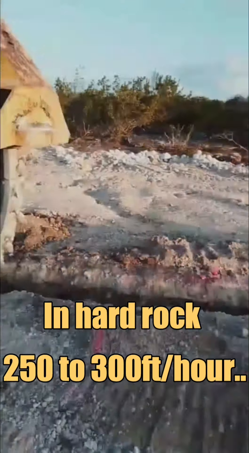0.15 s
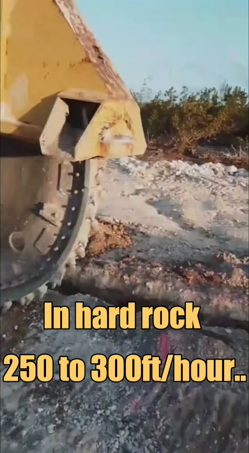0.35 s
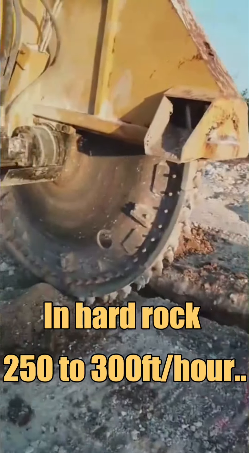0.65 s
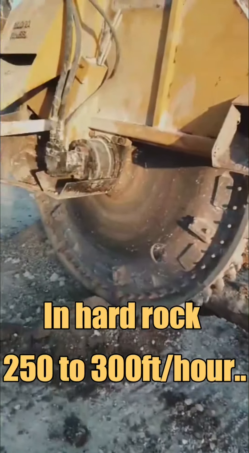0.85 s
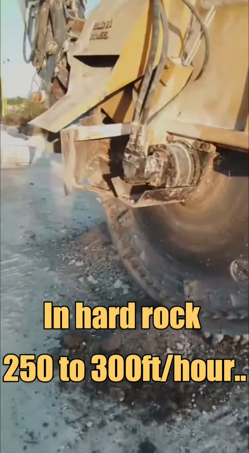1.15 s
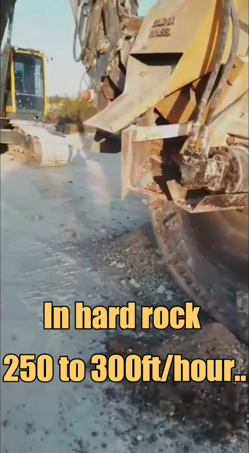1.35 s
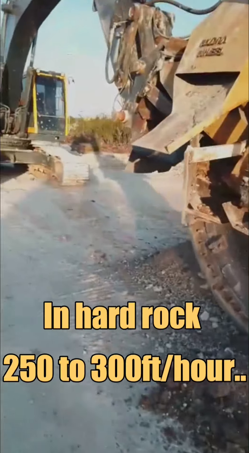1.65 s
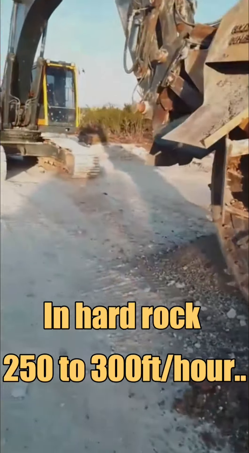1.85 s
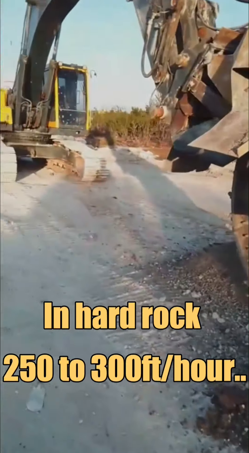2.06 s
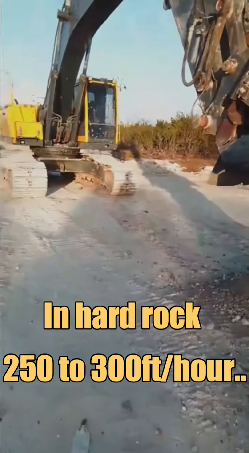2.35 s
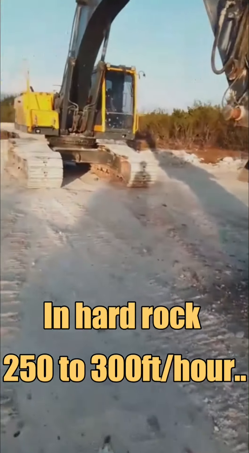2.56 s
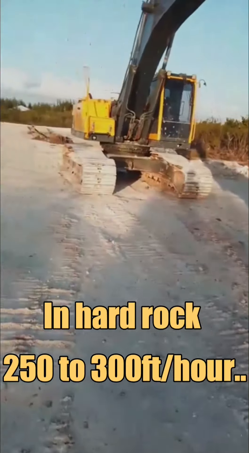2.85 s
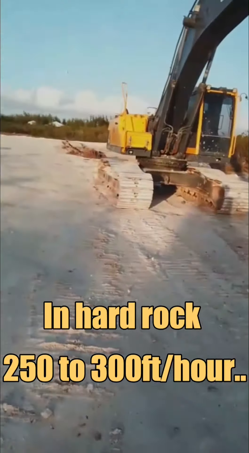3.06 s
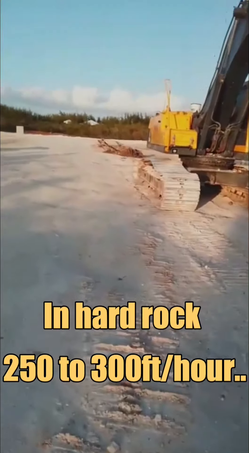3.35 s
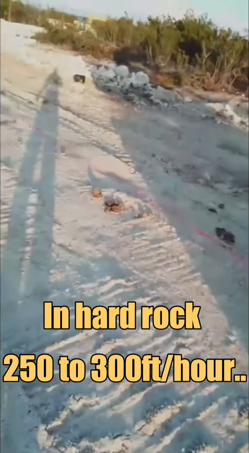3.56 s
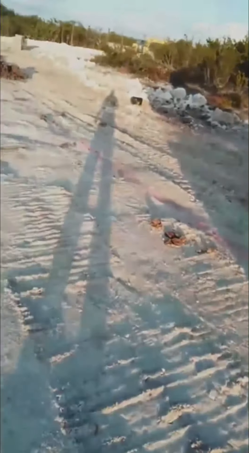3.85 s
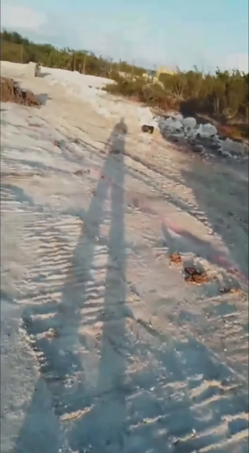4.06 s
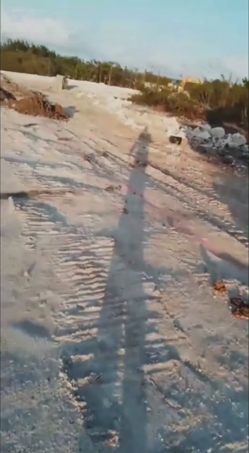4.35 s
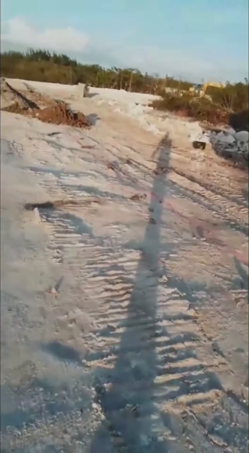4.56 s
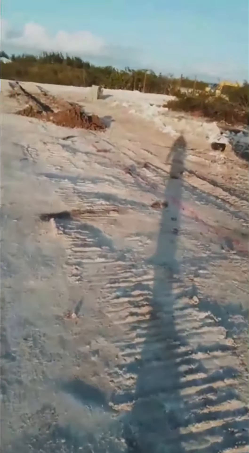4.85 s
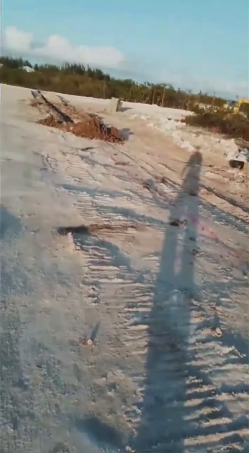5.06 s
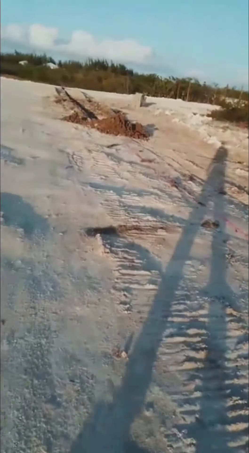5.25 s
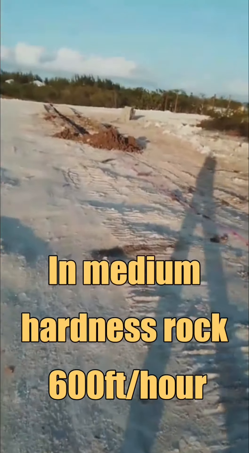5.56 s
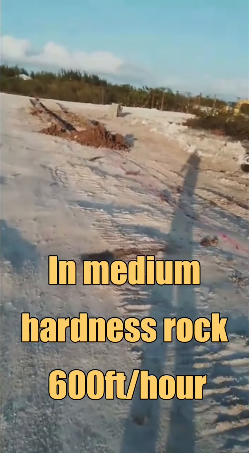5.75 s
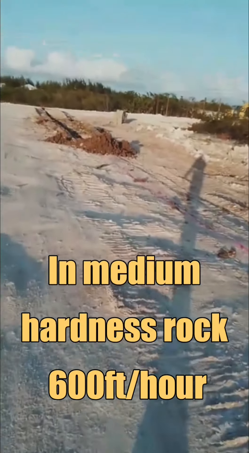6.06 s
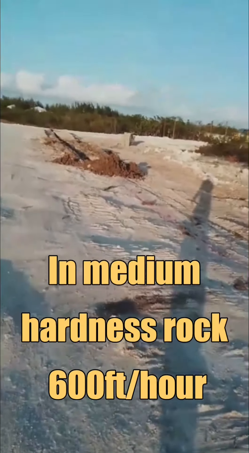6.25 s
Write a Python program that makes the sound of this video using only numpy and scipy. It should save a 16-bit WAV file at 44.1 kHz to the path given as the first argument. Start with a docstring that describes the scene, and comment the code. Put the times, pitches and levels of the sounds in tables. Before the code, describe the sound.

Distant muffled diesel idle with soft knocks and a burst of wind buffeting, then abruptly a much louder, brighter, clattering idle that holds steady.

```python
"""Idling six-cylinder diesel, far then near

A diesel machine idles on open ground, heard from afar, then after a hard cut from close by.
Engine: shaped noise throbbing with six firings a cycle; one loud cylinder knocks, a thin cover rings.
Close by, valve gear ticks. A hydraulic pump hums at multiples of one pitch over a faint drone.
Wind: decaying sine thumps on the microphone, lumpy noise flutter and rumble.
Treble: roar and knocks below a moving edge, narrow hissing bands and a faint broad hiss."""
import sys
import numpy as np
from scipy import signal
from scipy.fft import rfft, irfft, next_fast_len
from scipy.io import wavfile
from scipy.ndimage import uniform_filter1d, map_coordinates

SR = 44100
rng = np.random.default_rng(int(sys.argv[2]) if len(sys.argv) > 2 else 0)


def how_loud(loudness_db):
    """Turn decibels into a plain amplitude multiplier (0 dB gives 1, 20 dB gives 10)."""
    steps = np.asarray(loudness_db, float) / 20
    return 10 ** steps


def digitize_waveform(pressure):
    """Quantize a signal to 16-bit integers and store it at the path in sys.argv[1].

    Rows of a 2-D input are taken as channels; values are limited to [-1, 1].
    """
    field = np.atleast_2d(pressure).T
    bounded = np.clip(field, -1, 1)
    quanta = np.round(bounded * 32767).astype(np.int16)
    wavfile.write(sys.argv[1], SR, quanta)


N = 282636
T = np.arange(N) / SR
CUT_S = 3.5665  # far position before, near after
CYCLE_HZ = 6.504  # four-stroke cycles

# All levels are relative; pairs are (far, near).
# Roar over time: [t/s, level/dB, bass over it/dB, treble over it/dB]
ROAR = ([(0, -38.5, 7.5, 9), (.6, -39, 8, 5.5), (1.1, -38.5, 4.5, 5), (1.8, -38.5, 8, 3),
        (2.2, -37.5, 8, -1.5), (2.7, -37.5, -5.5, 2), (3.56, -38, 7, -0.5)], [(3.57, -21.5, 2.5, 0),
        (4.1, -21, -0.5, 0), (4.5, -21, -1.5, 1.5), (5.0, -21.5, -4, -0.5), (5.7, -22, -3.5, -1.5),
        (6.41, -22.5, -4.5, -1.5)])
BASS_BELOW_HZ, TREBLE_ABOVE_HZ = 560, 1950
# Roar noise density, far and near: [f/Hz, density/dB]
FAR_SPECTRUM = [(100, -48), (170, -17), (303, -7), (337, -14.5), (552, -14.5), (693, -3.5), (830, -8.5),
                (1280, -7.5), (1360, -8.5), (1480, -13), (1670, -12), (2600, -22.5), (3000, -30),
                (3900, -68), (6600, -120)]
NEAR_SPECTRUM = [(100, -69.5), (170, -26.5), (222, -13), (307, -2), (425, -6.5), (614, -6), (662, -10.5),
                 (712, -8.5), (1050, -11), (1630, -17.5), (1860, -15.5), (2610, -22.5), (3620, -29),
                 (4860, -32), (5800, -44), (7540, -73), (12800, -120)]
# Hood resonances and dips: [f/Hz, width/Hz, gain/dB]
HOOD = [(846, 11, 2.5), (1068, 110, 3), (1256, 49, 1.5), (1843, 57, 5.5), (2640, 110, 7), (4560, 110, -4.5)]
# Moving upper edge of roar and knocks, pair: [t/s, f/Hz]
EDGE = ([(0, 3120), (.56, 3040), (.6, 2840), (.74, 2820), (.85, 2635), (1.78, 2700), (1.86, 2300),
        (1.95, 1970), (2.475, 1950), (2.495, 2660), (3.3, 2870), (3.56, 2500)], [(3.57, 5600), (4.0, 5570),
        (4.82, 5300), (4.95, 5200), (5.48, 4980), (5.58, 4900), (5.8, 4760), (5.86, 4270), (6.41, 4170)])
# Spots of engine sound that rise or sink: [t/s, half length/s, f/Hz, half width/Hz, gain/dB]
SPOTS = [(0.27, 0.42, 2590, 74, 9.5), (1.26, 0.17, 2500, 150, 7.5), (0.24, 0.098, 2660, 180, -7),
         (1.12, 0.27, 1710, 96, -14), (1.16, 0.26, 2340, 170, -11), (2.7, 0.91, 1400, 62, -10.5),
         (2.6, 0.063, 2000, 48, -13), (2.1, 0.27, 175, 166, -21), (5.4, 0.58, 4600, 130, -17),
         (5.1, 0.25, 4960, 96, 1), (4.6, 0.07, 5300, 320, -7), (3.1, 0.17, 5450, 200, -3),
         (5.7, .25, 4530, 460, -8.5), (4.17, 0.17, 4300, 60, -7.5), (4.0, .5, 3600, 250, -3.5),
         (3.4, .42, 3800, 60, -9), (3.1, 0.23, 4100, 67, -11)]

# First knock of the loud cylinder, far and near: [t/s]
FIRST_KNOCK_S = .039, 3.696
# Knock strength: [t/s, level/dB]
KNOCK_LEVEL = [(0, -22), (.4, -18.5), (.9, -20.5), (1.7, -27), (3.55, -35.5), (3.58, -10.5), (6.41, -12.5)]
# Knocks with a set time and strength: [t/s, level/dB]
HARD_KNOCKS = [(.046, -21), (.198, -21), (.346, -18.5), (.502, -18.5), (3.697, -5.5), (4.314, -2.5),
               (4.62, -5), (4.771, -5), (5.387, -8.5), (5.695, -8), (6.001, -5.5), (5.543, -9)]
# Engine block resonances in the knock: [f/Hz, width/Hz, level/dB]
BLOCK = [(578, 165, 4), (1026, 230, -1.5), (1425, 190, -3), (1970, 1100, -11.5), (2482, 194, -6.5),
         (4320, 5300, -28)]
# Thin cover's ring after each knock: [f/Hz, level/dB, t60/s]
COVER = [(836.4, -9, 0.16), (1013, -11, 0.17), (1420, -18, 0.23)]
KNOCK_SCATTER_DB = 2
CRACK_DB, CRACK_T60_S = -5, 0.028  # sharp front of a knock
CHATTER_DB, CHATTER_T60_S, CHATTER_SCATTER_DB = -2.5, 0.049, 1.5  # burst at every firing

# Valve gear close by: [t/s, broad tick level/dB, thin ring level/dB]
VALVES = [(3.57, -43, -57), (3.7, -31.5, -56), (4.2, -30, -49), (4.4, -35, -44), (4.7, -34.5, -51.5),
          (5.1, -40.5, -46), (5.45, -41, -42.5), (5.8, -53, -43.5), (6.41, -61, -52)]
# Modes of one valve tick: [f/Hz, level/dB, t60/s]
TAPPET = [(3984, 1.5, 0.048), (4170, -2, 0.039), (4240, -2, 0.038), (4440, -4, .03), (4800, -4, .03)]
VALVE_RISE = 0.07  # share a tick's pitch has climbed after 15 ms

PUMP_HZ = 312.2
# Pump hum, pair: [t/s, level/dB of multiples 1, 2, 4]
PUMP = ([(0, -45, -69, -42), (.36, -46, -66, -45), (.53, -40, -65, -55), (.62, -55, -47, -62),
        (.8, -64, -58, -50), (1.15, -54, -61, -43.5), (1.7, -63.5, -45, -47.5), (2.5, -47, -50, -64),
        (2.96, -43, -40.5, -53), (3.16, -46, -48, -46), (3.3, -58, -37, -50), (3.56, -53, -45.5, -47)],
        [(3.58, -31.5, -47, -29), (3.65, -26, -54, -31.5), (3.83, -22.5, -44, -36), (3.96, -32, -39, -38.5),
        (4.12, -46, -43, -55), (4.33, -22.5, -29.5, -48), (4.47, -38, -31.5, -42), (4.6, -37, -34, -43),
        (4.72, -30, -30, -45), (4.89, -32.5, -28.5, -42.5), (5.0, -41.5, -32, -47), (5.45, -32, -33, -46),
        (5.85, -34, -32.5, -41.5), (6.0, -30.5, -35.5, -40), (6.12, -27, -44, -38),
        (6.2, -35.5, -42, -32.5), (6.41, -30.5, -54, -38)])
# Throb depth at the firing rate: [multiples 1, 2, 4]
PUMP_THROB = (0.34, 0.46, 0.22)
# Faint drone lines: [f/Hz, level/dB]
DRONE = [(115, -66.5), (150.7, -48)]

# Thumps on the microphone: [t/s, level/dB, f/Hz, t60/s, sharp front level over it/dB]
GUSTS = [(1.219, -21, 251.5, 0.093, -22), (1.262, -17, 338, 0.08, -7), (1.391, -12, 306, 0.022, -18),
         (1.402, -15, 281, 0.064, -9), (1.469, -18, 272, 0.1, -15), (1.509, -15, 323, 0.035, -20),
         (1.546, -14.5, 268, 0.026, -24), (2.078, -22, 426, 0.04, -16), (2.446, -18.5, 374, 0.083, -27),
         (2.478, -8, 307, 0.021, -12), (2.491, -15.5, 374, 0.038, -24), (2.573, -10.5, 289, 0.047, -26),
         (2.651, -15.5, 292, 0.052, -19), (2.756, -5, 280, 0.038, -15), (2.765, -12.5, 342, 0.052, 1),
         (2.777, -8.5, 405, 0.063, -6), (2.792, -7, 316, 0.031, -8), (2.8, -8.5, 414, 0.026, -10),
         (2.813, -8, 377, 0.039, -20), (2.826, -14.5, 298, .03, -11), (2.835, -8.5, 326, 0.018, 1),
         (2.84, -8, 297, .035, -18), (2.855, -13, 320, 0.028, -11), (2.875, -19, 330, 0.026, -14),
         (2.899, -14.5, 339, 0.05, -11), (2.914, -12.5, 297, 0.045, -23), (2.943, -12, 363, 0.042, -1),
         (2.964, -12, 294, 0.048, -17), (3.035, -16.5, 295, 0.063, -14), (3.322, -18.5, 318, 0.03, -19),
         (3.34, -20, 342, 0.056, -15)]
# Wind strength, pair: [t/s, level/dB]
WIND = ([(0, -45), (.25, -52), (.5, -41), (.84, -54), (1.0, -36.5), (1.15, -42), (1.28, -34.5),
        (1.5, -31.5), (1.62, -38), (1.75, -45.5), (1.85, -66), (2.12, -62), (2.2, -38), (2.49, -32),
        (2.62, -31.5), (2.745, -28.5), (2.79, -18.5), (2.87, -24), (2.96, -29.5), (3.3, -41.5),
        (3.56, -41)], [(3.57, -37), (4.3, -38), (4.9, -40), (5.7, -43), (6.41, -41)])
# Flutter noise density: [f/Hz, density/dB]
FLUTTER = [(100, -40.5), (170, -9.5), (248, 3.5), (358, 0.5), (398, -4), (609, -6.5), (1200, -44.5),
           (1560, -66), (2640, -120)]
# Rumble noise density: [f/Hz, density/dB]
RUMBLE = [(15, -56.5), (25, -28), (49, -25), (108, 0), (165, 3), (210, -26), (360, -120)]
RUMBLE_DB, RUMBLE_DB_PER_DB, NEAR_RUMBLE_DB = -52, 0.71, 3  # at strength -37 dB; slope; added near

# Hissing bands: [from/Hz, to/Hz, thin line f/Hz, rest level/dB,
#                 swells [t/s, hold/s, level/dB, fade/(dB/s)]]
HISS_BANDS = [(3130, 4200, 3550, -84.5, [(2.7, .1, -67.5, 49), (2.88, 0.18, -54.5, 55.5)]),
              (3300, 3730, 3330, -94.5, [(1.48, 0.15, -64.5, 90), (3.1, 0.15, -60.5, 79.5)]),
              (3450, 3800, 3680, -93.5, [(2.58, .2, -63, 59.5), (3.3, 0.09, -70.5, 59.5)]),
              (4860, 4950, 4920, -85.5, [(0, .055, -53.5, 53), (1.288, 0.43, -56.5, 54),
              (5.948, 0.16, -73, 57)]), (4830, 4900, 4870, -88, [(1.88, 0.26, -58, 200)]),
              (4720, 4870, 4790, -87.5, [(2.3, 0.18, -74.5, 53), (2.66, .12, -63, 60),
              (3.22, 0.1, -62.5, 80)]), (5050, 5170, 5110, -86.5, [(2.65, .15, -68.5, 55.5),
              (3.15, 0.22, -70, 119)]), (4760, 5670, 5300, -83, [(2.84, .2, -54.5, 70)]),
              (5390, 5510, 5440, -93.5, [(1.3, .08, -77, 59), (1.44, .33, -66, 150),
              (2.45, 0.11, -72, 100)]), (6000, 6520, 6450, -89.5, [(1.3, .17, -67.5, 48)]),
              (6380, 7020, 6800, -90.5, [(2.82, 0.17, -67, 121)])]
SWELL_DB_PER_S = 149
# Broad hiss, pair: [t/s, hiss level/dB, high hiss level/dB]
AIR = ([(0, -78.5, -76), (.56, -78.5, -76), (1.3, -77.5, -88), (2.8, -79.5, -90), (3.54, -84.5, -86)],
       [(3.57, -74, -79), (3.75, -73.5, -78), (4.3, -74, -85), (5.2, -76.5, -91.5), (6.41, -79, -96.5)])
# Densities of hiss and high hiss: [f/Hz, density/dB]
HISS = [(1180, -45.5), (2000, -5.5), (3590, -15), (4130, -18), (4820, -9.5), (5160, -12.5), (5830, -12),
        (9360, -25.5), (15700, -31), (15800, -70)]
HIGH_HISS = [(8000, -12), (9500, -9.5), (10800, -10), (12000, -24)]

# Faint broad ticks: [t/s, level/dB]
TICKS = [(5.348, -51.5), (5.358, -53)]
TICK_T60_S = .012
CUT_CLICK_DB, CUT_CLICK_S = -16, .00003


def unit(x):
    """Scale to rms 1."""
    return x / np.sqrt(np.mean(x ** 2) + 1e-20)


def along(points, hz):
    """Interpolate (Hz, value) points on a log frequency axis."""
    f, v = np.transpose(points)
    return np.interp(np.log(hz + 1), np.log(f + 1), v)


def curves(rows, t=T):
    """Interpolate each column after the time at times t."""
    s, *cols = np.transpose(rows)
    return np.array([np.interp(t, s, c) for c in cols])


def spliced(far, near):
    """Far curves up to the cut, near ones after it."""
    return np.where(T < CUT_S, curves(far), curves(near))


def wobble(rate_hz):
    """Smooth random curve with rate_hz knots a second."""
    knots = rng.standard_normal(int(N * rate_hz / SR) + 4)
    return map_coordinates(knots, [np.arange(N) * rate_hz / SR])


def noise(response):
    """Noise of rms 1 with a frequency-dependent gain."""
    m = next_fast_len(N + 8192)
    spectrum = rfft(rng.standard_normal(m)) * response(np.fft.rfftfreq(m, 1 / SR))
    return unit(irfft(spectrum, m)[:N])


def bumps(modes, hz):
    """One resonance curve of peak 1 per (Hz, width, ..) row."""
    return np.array([1 / (1 + ((hz - c) / (w / 2)) ** 2) for c, w, _ in modes])


def band(lo_hz, hi_hz, skirt_hz):
    """Response of a flat band with steep skirts."""
    def response(hz):
        outside_hz = np.maximum(np.maximum(lo_hz - hz, hz - hi_hz), 0)
        return np.exp(-(outside_hz / skirt_hz) ** 2)
    return response


def beats(count, phase, sharp):
    """Throb of count beats per engine cycle, peak 1."""
    return np.exp(sharp * (np.cos(2 * np.pi * (count * CYCLE_HZ * T - phase)) - 1))


def field(shape, tall, long):
    """Random patches over frequency and time, rms 1."""
    patches = uniform_filter1d(rng.standard_normal(shape), size=tall, axis=0)
    return unit(uniform_filter1d(patches, size=long, axis=1))


def streaky(x, streak_db, patch_db):
    """Give x thin lasting streaks and short broad patches of gain."""
    z = signal.stft(x, nperseg=1024)[2]
    streaks = streak_db * field(z.shape, tall=2, long=24)
    patches = patch_db * field(z.shape, tall=8, long=4)
    y = signal.istft(z * how_loud(streaks + patches), nperseg=1024)[1][:N]
    # offset the mean power the random gain adds
    return y * np.exp(-(np.log(10) / 20) ** 2 * (streak_db ** 2 + patch_db ** 2))


def engine(spectrum, levels, edge, knock, throb_db, ragged_hz):
    """Firing-throbbed noise roar with bent bass and treble, plus knocks, under a ragged upper edge."""
    def colour(hz):
        return how_loud(along(spectrum, hz) + np.transpose(HOOD)[2] @ bumps(HOOD, hz))

    def above(corner_hz):
        return 1 / (1 + (corner_hz / (hz[:, None] + 1)) ** 8)

    throb = throb_db * beats(count=6, phase=0.31, sharp=1.8)
    roar = noise(colour) * how_loud(throb + 0.54 * wobble(5.85))
    roar = streaky(roar, streak_db=1.82, patch_db=0.5)
    hz, t, z = signal.stft([roar, knock], SR, nperseg=1024)
    level_db, bass_db, treble_db = curves(levels, t)
    bend_db = level_db + bass_db * (1 - above(BASS_BELOW_HZ)) + treble_db * above(TREBLE_ABOVE_HZ)
    spot_db = sum(db * np.exp(-((t - s) / long) ** 4 - ((hz[:, None] - mid) / wide) ** 4)
                  for s, long, mid, wide, db in SPOTS)
    beyond_hz = hz[:, None] - curves(edge, t) + ragged_hz * field(bend_db.shape, tall=2, long=20)
    below_edge = 1 / (1 + np.exp(np.clip(beyond_hz / 30, -50, 50)))
    heard = how_loud(spot_db) * (how_loud(-38.0) + below_edge)
    return signal.istft((z[0] * how_loud(bend_db) + z[1]) * heard, SR, nperseg=1024)[1][:N]


def knocks():
    """Once a cycle: envelope of the loud cylinder's combustion burst, and the cover ring it starts."""
    swell, ring, t = np.zeros(N + SR), np.zeros(N + SR), np.arange(SR // 4) / SR
    far_times = np.arange(FIRST_KNOCK_S[0], CUT_S, 1 / CYCLE_HZ)
    near_times = np.arange(FIRST_KNOCK_S[1], T[-1], 1 / CYCLE_HZ)
    times = np.r_[far_times, near_times]
    luck = rng.standard_normal((len(times), len(COVER) + 2))
    levels = curves(KNOCK_LEVEL, times)[0] + KNOCK_SCATTER_DB * luck[:, -1]
    times = times + .002 * luck[:, -2]
    for s, db in HARD_KNOCKS:
        nearest = np.argmin(abs(times - s))
        times[nearest], levels[nearest] = s, db
    decay = how_loud(-60 * t / 0.15) + how_loud(CRACK_DB - 60 * t / CRACK_T60_S)
    burst = decay * (1 - np.exp(-t / .003))
    ring_rise = 1 - np.exp(-(t / .014) ** 2)
    for s, db, each in zip(times, levels, luck):
        start = round(s * SR)
        swell[start:][:len(t)] += how_loud(db) * burst
        modes = sum(how_loud(level + 2.0 * u - 60 * t / t60) * np.sin(2 * np.pi * hz * (1 + 0.01 * u) * t)
                    for (hz, level, t60), u in zip(COVER, each))
        ring[start:][:len(t)] += how_loud(db) * ring_rise * modes
    return swell[:N], ring[:N]


def chatter():
    """Envelope of a short burst at every firing, each of its own size."""
    firing = 6 * CYCLE_HZ * (T + 1 / CYCLE_HZ - np.where(T < CUT_S, *FIRST_KNOCK_S))
    sizes_db = CHATTER_SCATTER_DB * rng.standard_normal(int(firing.max()) + 1)
    since_s = firing % 1 / (6 * CYCLE_HZ)
    level_db = curves(KNOCK_LEVEL)[0] + CHATTER_DB + sizes_db[firing.astype(int)]
    return how_loud(level_db - 60 * since_s / CHATTER_T60_S) * (1 - np.exp(-since_s / 0.0038))


def valves():
    """Near only: three ticks a cycle as decaying, rising modes; a thin noise ring swells with each."""
    tick_db, ring_db = curves(VALVES)
    tick, t = np.zeros(N + SR), np.arange(SR // 20) / SR
    times = (np.arange(3 * CYCLE_HZ * T[-1]) + .14) / (3 * CYCLE_HZ)
    warped_s = t + VALVE_RISE * t ** 2 / .03
    for s, luck in zip(times, rng.standard_normal((len(times), 2, len(TAPPET)))):
        modes = sum(how_loud(db + 1.5 * u - 60 * t / t60) * np.sin(2 * np.pi * hz * (1 + 0.014 * v) * warped_s)
                    for (hz, db, t60), u, v in zip(TAPPET, *luck))
        tick[round(s * SR):][:len(t)] += modes * (1 - np.exp(-t / 0.0035))
    ring = (.3 + beats(count=3, phase=0.2, sharp=12.0)) * noise(band(3830, 3870, 25))
    return (how_loud(tick_db) * tick[:N] + how_loud(ring_db) * ring) * (T >= CUT_S)


def pump():
    """Wavering sine multiples with side lines from the firings' throb, over a faint drone."""
    turn = 2 * np.pi * (PUMP_HZ * T + 0.046 * wobble(35))
    throb = np.cos(2 * np.pi * (6 * CYCLE_HZ * T - .25))
    hum = 0
    for k, db, depth in zip((1, 2, 4), spliced(*PUMP), PUMP_THROB):
        gain = np.sqrt(2) * how_loud(db + (2.0 + 0.16 * k) * wobble(30))
        hum = hum + gain * (1 + depth * throb) * np.sin(k * turn)
    drone = sum(how_loud(db + 1.8 * wobble(3.5)) * np.sin(2 * np.pi * hz * T) for hz, db in DRONE)
    drone_gate = np.clip((spliced(*WIND)[0] + 60) / 8, 0, 1)  # drone falls away in the wind's lull
    return hum + drone_gate * drone


def wind():
    """Eddies thump the microphone for a cycle or two over lumpy noise flutter; a rumble lies below."""
    thumps, t = np.zeros(N + SR), np.arange(SR // 8) / SR
    for (s, db, hz, t60, front_db), luck in zip(GUSTS, rng.standard_normal((len(GUSTS), 6))):
        pitch_hz = hz * np.c_[[.75, 1, 1.5]] * np.exp(0.057 * luck[:3, None])
        partials = np.c_[[.5, 1, .35]] * np.sin(2 * np.pi * pitch_hz * t + 0.51 * luck[3:, None])
        front_hz = 740 * np.exp(0.096 * luck[0])
        front = how_loud(front_db - 60 * t / 0.04) * np.sin(2 * np.pi * front_hz * t)
        envelope = how_loud(db + 5.5 - 60 * t / t60) * (1 - np.exp(-(t / (0.055 * t60)) ** 2))
        thumps[round(s * SR):][:len(t)] += envelope * (partials.sum(axis=0) + front)
    low_cut = signal.butter(3, 190, "high", fs=SR, output="sos")
    strength_db, = spliced(*WIND)
    lumps = how_loud(4.8 * np.tanh(0.31 * wobble(60)) + 0.8 * wobble(60))
    flutter = how_loud(strength_db) * unit(lumps * noise(lambda hz: how_loud(along(FLUTTER, hz))))
    rumble_db = RUMBLE_DB + RUMBLE_DB_PER_DB * (strength_db + 37.0)
    rumble_db = rumble_db + np.where(T < CUT_S, 0, NEAR_RUMBLE_DB)
    rumble = unit(how_loud(2.0 * wobble(21)) * noise(lambda hz: how_loud(along(RUMBLE, hz))))
    return signal.sosfilt(low_cut, thumps[:N] + flutter) + how_loud(rumble_db) * rumble


def treble(knock):
    """Narrow noise bands that come and go over a faint broad hiss, which swells with the knocks."""
    narrow, slow = 0, T[::64]
    for lo, hi, line, rest_db, swells in HISS_BANDS:
        def colour(hz):
            return band(lo, hi, 40)(hz) * (1 + 1.9 * bumps([(line, 50, 0)], hz)[0])

        gain = how_loud(rest_db)
        for s, hold, db, fade_db in swells:
            rise_db = SWELL_DB_PER_S * np.maximum(s - slow, 0)
            fall_db = fade_db * np.maximum(slow - s - hold, 0)
            gain = gain + how_loud(db - rise_db - fall_db)
        narrow = narrow + np.interp(T, slow, gain) * how_loud(0.58 * wobble(25.3)) * noise(colour)
    hiss_db, high_db = spliced(*AIR)
    hiss = how_loud(hiss_db + 15.5) * (1 + 1.4 * knock) * noise(lambda hz: how_loud(along(HISS, hz)))
    high = noise(lambda hz: how_loud(along(HIGH_HISS, hz)) * (abs(hz - 10000) < 3000))
    broad = hiss + how_loud(high_db + 4.5) * high
    return streaky(narrow, streak_db=3.0, patch_db=1.0) + streaky(broad, streak_db=3.5, patch_db=1.2)


def clicks():
    """Decaying noise ticks, and an exponential pulse at the cut."""
    s, db = np.transpose(TICKS)
    since_s = T - s[:, None]
    decay = how_loud(db[:, None] - 60 * np.maximum(since_s, 0) / TICK_T60_S) * (since_s > 0)
    ticks = decay.sum(axis=0) * rng.standard_normal(N)
    after = np.arange(N) - round(CUT_S * SR) - 4  # samples
    pulse = (after >= 0) * np.exp(-np.maximum(after, 0) / (CUT_CLICK_S * SR))
    return ticks + how_loud(CUT_CLICK_DB) * pulse


def scene():
    """Two positions joined by a hard cut; close by, the burst covers most of the ring."""
    swell, ring = knocks()
    block = noise(lambda hz: how_loud(np.transpose(BLOCK)[2]) @ bumps(BLOCK, hz) * (hz > 150))
    burst = how_loud(-12.5) * (swell + chatter()) * block
    far_knock = how_loud(-4.5) * burst + how_loud(1.5) * ring
    near_knock = burst + how_loud(-6.0) * ring
    far = engine(FAR_SPECTRUM, ROAR[0], EDGE[0], far_knock, throb_db=-1.0, ragged_hz=60)
    near = engine(NEAR_SPECTRUM, ROAR[1], EDGE[1], near_knock, throb_db=1.0, ragged_hz=80)
    machine = np.where(T < CUT_S, far, near) + valves() + pump()
    return (machine + treble(swell) + wind() + clicks())[None]


def low_pass(x):
    """Removes everything above the highest recorded frequency."""
    return signal.sosfilt(signal.butter(12, 16670, fs=SR, output="sos"), x)


def record(dry):
    """Fade the last 4 ms; the microphone has a narrow dip at the foot of its low cut."""
    faded = dry * np.clip((T[-1] - T) / .004, 0, 1)
    m = next_fast_len(N + 8192)
    hz = np.fft.rfftfreq(m, 1 / SR)
    dip = 1 - 1.27 * bumps([(164.2, 27.8, 0)], hz)[0]
    mix = irfft(rfft(faded, m) * dip, m)[:, :N]
    return low_pass(mix)


dry = scene()
out = record(dry)
digitize_waveform(out)
```